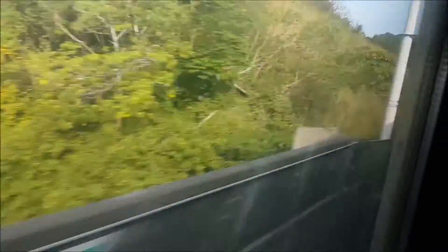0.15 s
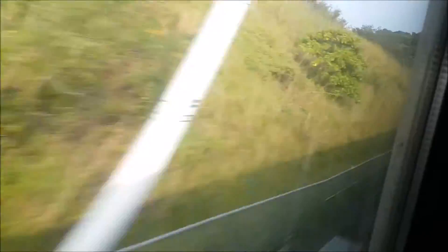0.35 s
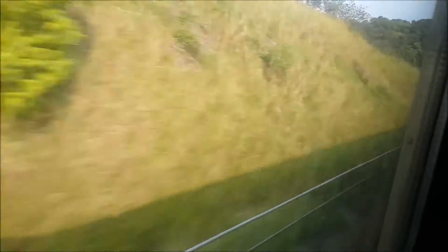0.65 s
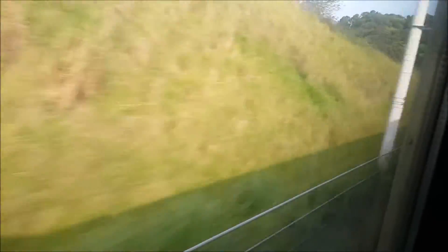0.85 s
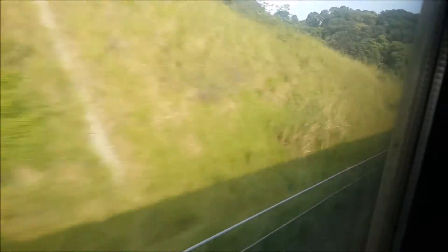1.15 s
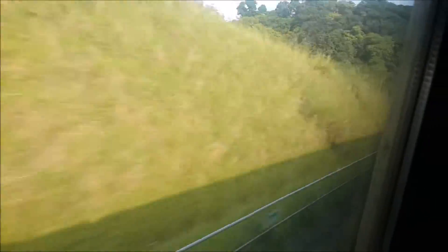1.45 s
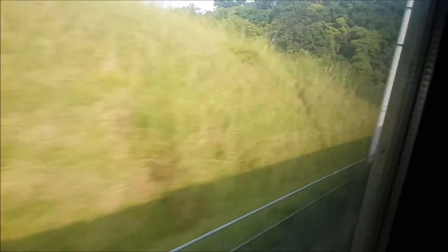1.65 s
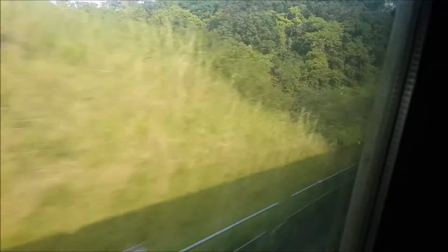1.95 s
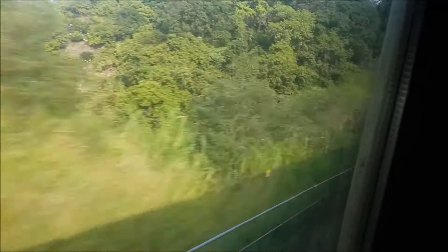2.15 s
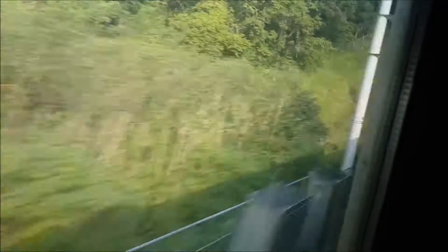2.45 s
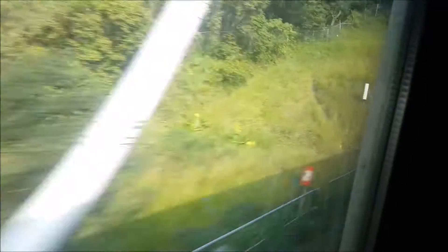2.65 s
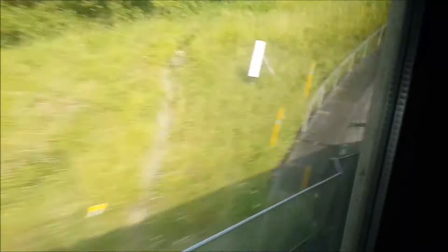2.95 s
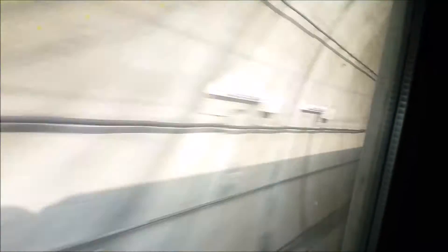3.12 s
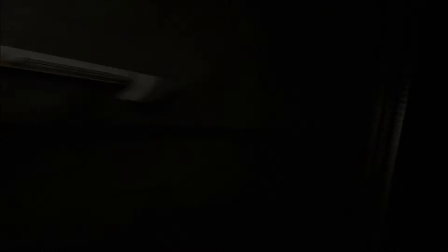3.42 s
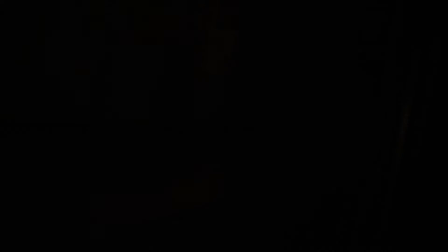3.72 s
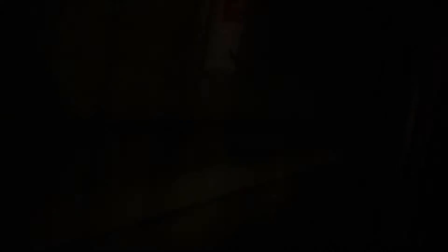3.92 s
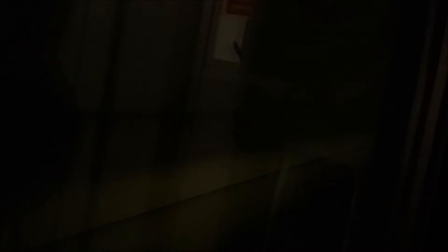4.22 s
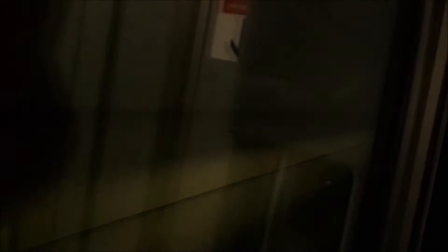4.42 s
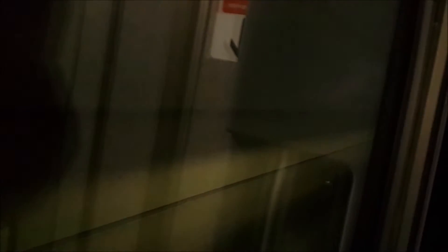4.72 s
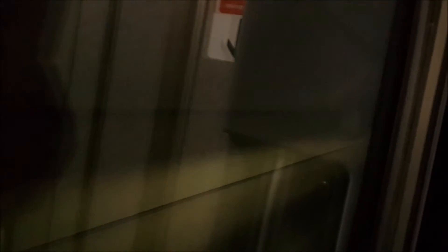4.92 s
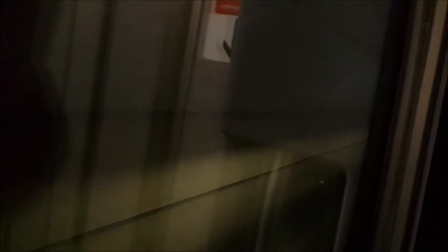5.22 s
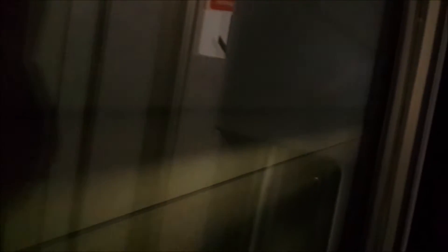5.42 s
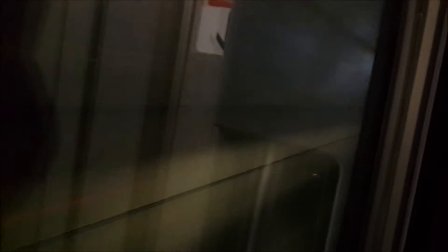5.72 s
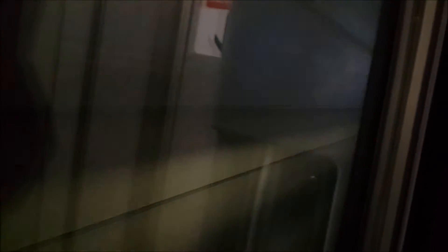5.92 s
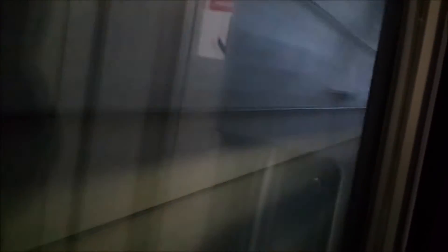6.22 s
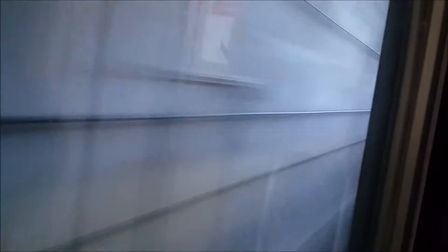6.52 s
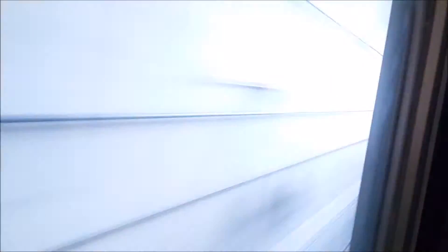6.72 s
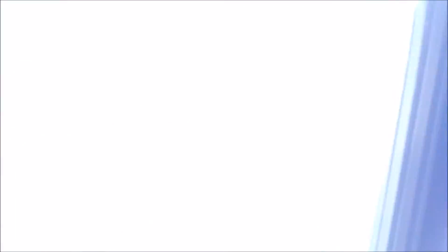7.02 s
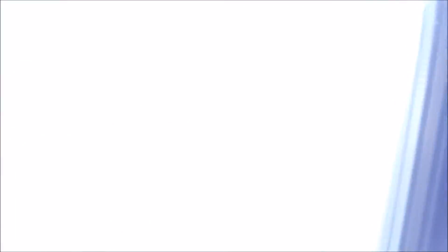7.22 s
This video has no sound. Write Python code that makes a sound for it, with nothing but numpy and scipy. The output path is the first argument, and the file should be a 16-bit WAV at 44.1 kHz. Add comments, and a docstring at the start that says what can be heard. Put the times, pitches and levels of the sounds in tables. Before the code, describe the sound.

A high-speed train runs along, heard from a window seat inside the car. A deep, gently throbbing rumble carries on throughout beneath a softer roar of wheels and air. The drive whines faintly, and the steel wheels sing in thin high swells with a few tiny squeaks. Midway a short tunnel colours the noise slightly, and plastic trim ticks twice near the end.

```python
"""Inside a high-speed train that slowly gathers speed and runs through a short tunnel.
The bogies shake the car body, which booms under the roar of wheels and air. The drive whines in
evenly spaced orders; the rubbing steel wheels sing faintly in swells and squeaks. The tunnel
walls colour the running noise, and the plastic trim slips and ticks twice."""
import sys
import numpy as np
from scipy import signal
from scipy.fft import rfft, irfft
from scipy.io import wavfile
from scipy.ndimage import uniform_filter1d, minimum_filter1d

SR = 44100
rng = np.random.default_rng(int(sys.argv[2]) if len(sys.argv) > 2 else 0)


def wav_record(signal):
    """Record a signal, one row per channel, as 16-bit PCM in the file named by sys.argv[1]."""
    frames = np.transpose(np.atleast_2d(signal))
    bounded = np.clip(frames, -1, 1)
    # unit amplitude maps onto the largest positive 16-bit level
    quanta = np.round(bounded * 32767).astype(np.int16)
    wavfile.write(sys.argv[1], SR, quanta)


N = 324576
TIME, HZ = np.arange(N) / SR, np.fft.rfftfreq(N, 1 / SR)


def amp(db):
    """Decibels to gain."""
    return 10 ** (np.asarray(db) / 20)


def unit_rms(x):
    """Scales to rms 1."""
    return x / np.sqrt(np.mean(abs(x) ** 2) + 1e-20)


def spectrum(rows):
    """A frequency table at every FFT bin, interpolated over log f."""
    hz, value = np.transpose(rows)
    return np.interp(np.log(HZ + 1), np.log(hz + 1), value)


def curve(rows, column=1):
    """One column of a time table at every sample."""
    columns = np.transpose(rows)
    return np.interp(TIME, columns[0], columns[column])


def swing_db(rows):
    """A level curve about its mean."""
    db = curve(rows)
    return db - db.mean()


def pan(side_db):
    """Stereo gains for a left-minus-right (L-R) level."""
    return amp(np.array([[.5], [-.5]]) * side_db)


def hump(peak_s, length_s):
    """Smooth rise and fall, 0 to 1 and back."""
    return np.cos(np.pi * np.clip((TIME - peak_s) / length_s, -.5, .5)) ** 2


def drift(rate_hz, channels=1):
    """Smooth random motion, rms 1."""
    white = rfft(rng.standard_normal((channels, N)))
    return unit_rms(irfft(white * np.exp(-.5 * (HZ / rate_hz) ** 2), N))


def ring(hz, width_hz, coherence=0, steadiness=0):
    """A randomly rubbed resonance; steadiness > 0 evens its flutter, < 0 breaks it into chirps."""
    detuning = np.fft.fftfreq(N, 1 / SR) / width_hz
    a, b = rng.standard_normal((2, N)) + 1j * rng.standard_normal((2, N))
    rubbing = np.array([a, coherence * a + np.sqrt(1 - coherence ** 2) * b])
    envelope = unit_rms(np.fft.ifft(rubbing / (1 + 1j * detuning) ** 2))
    envelope *= (abs(envelope) ** 2 + .1) ** (-steadiness / 2)
    carrier = np.exp(2j * np.pi * np.cumsum(hz * np.ones(N)) / SR)
    return unit_rms((envelope * carrier).real)


def in_tunnel(entry_s=3.46, exit_s=7.05, portal_s=.088):
    """0 in the open, 1 in the tunnel."""
    return np.clip(np.minimum(TIME - entry_s, exit_s - TIME) / portal_s + .5, 0, 1)


# Likeness of the two ears: f/Hz, coherence/1
CABIN_COHERENCE = [(60, .993), (180, .992), (280, .965), (450, .87), (730, .78), (1200, .25), (2000, .05),
                   (3300, .2), (6000, .03)]
# Cabin balance: f/Hz, L-R/dB
CABIN_BALANCE = [(90, -.5), (160, .5), (260, 1.2), (460, .3), (800, 4.5), (1300, 4.7), (2000, .3),
                 (3800, 2), (6200, -.3), (10000, 1.5), (14500, 4.5)]

def cabin_noise(shape_db):
    """Diffuse field, rms 1: alike at both ears in the bass, unrelated in the treble."""
    a, b = rfft(rng.standard_normal((2, N)))
    coherence = spectrum(CABIN_COHERENCE)
    mid, side = a * np.sqrt(1 + coherence), b * np.sqrt(1 - coherence)
    ears = np.array([mid + side, mid - side]) * pan(spectrum(CABIN_BALANCE))
    return unit_rms(irfft(ears * amp(shape_db), N))


# Running gear through the floor: f/Hz, relative level/dB
BOGIE_SPECTRUM = [(12, -62), (24, -54), (32, -43), (40, -35), (48, -24.5), (70, -4), (92, -14), (114, -5.5),
                  (135, -7), (190, -7), (225, -9.5), (265, -16), (350, -22), (450, -27), (700, -57),
                  (1500, -78)]
# Car body resonances: f/Hz, width/Hz, lift/dB
BODY_MODES = [(148, 17, 7.5), (171.8, 12, 8.5), (208.3, 11, 4.5), (249.5, 9.7, 3), (279, 9.1, 6.5),
              (320, 12.6, 5), (384.7, 24, 6.5)]
# Swell of the boom: t/s, relative level/dB
BOOM_SWELL = [(.04, -14), (.16, -11.5), (.5, -14), (.8, -13), (1.3, -11), (1.42, -10), (1.6, -11),
              (1.9, -12.5), (2.2, -13), (2.35, -10.5), (2.75, -13.5), (2.89, -6.5), (2.98, -16.5),
              (3.13, -11.5), (3.33, -9), (3.6, -13), (3.74, -12), (3.95, -13.5), (4.2, -14.5), (4.28, -10),
              (4.5, -14.5), (4.82, -10.5), (5.0, -11), (5.2, -12), (5.55, -15), (5.8, -11), (6.0, -12),
              (6.28, -12.5), (6.45, -14), (6.85, -12), (6.92, -12.5), (7.2, -13), (7.36, -9.5)]

def body_rumble(gain_db=-11.5, boom_hz=(110, 260), drone_hz=174, steadiness=.31):
    """The bogies shake the body: an even rumble, and a swelling boom with one near-tonal resonance."""
    lift_db = sum(db / (1 + (2 * (HZ - hz) / width_hz) ** 2) for hz, width_hz, db in BODY_MODES)
    shaking = cabin_noise(spectrum(BOGIE_SPECTRUM) + lift_db)
    band = 1 / (1 + (boom_hz[0] / (HZ + 1)) ** 8) / (1 + (HZ / boom_hz[1]) ** 8)
    boom = irfft(rfft(shaking) * band, N)
    bed = shaking - boom
    boom += amp(-8.5) * ring(drone_hz, width_hz=8, coherence=1, steadiness=.97)
    power = uniform_filter1d(uniform_filter1d((boom ** 2).mean(0), size=3200), size=1600)
    evening = (power / power.mean()) ** (-steadiness / 2)  # tames the random throb
    return amp(gain_db) * (bed + boom * evening * amp(swing_db(BOOM_SWELL)))


# Rolling noise and air along the skin: f/Hz, relative level/dB
ROAR_SPECTRUM = [(150, -5), (400, -3), (620, 0.5), (800, -5), (1000, -7), (1250, -10.5), (1650, -10.5),
                 (1950, -7), (2600, -8), (3400, -21.5), (6800, -19), (9000, -31), (12000, -40.5),
                 (15400, -46)]
# Rush of wheels and air: t/s, relative level/dB
RUSH_LEVEL = [(0, 3), (.22, -0.6), (1.0, -1), (1.5, 0), (2.2, 2.5), (2.7, -0.1), (3.05, 1.5), (4.35, -0.8),
              (4.56, 2.5), (4.95, 0.5), (5.45, -1.5), (5.77, 2.5), (6.02, -0.3), (6.2, 3), (6.5, 1),
              (6.93, 3.5), (7.15, -1), (7.36, -0.5)]

def roar(gain_db=-25, floor_below_hz=700, air_above_hz=2200, gust_rms_db=.18, flutter_rms_db=1.06):
    """Floor noise, rolling noise and rushing air each follow the rush by their own amount."""
    noise = cabin_noise(spectrum(ROAR_SPECTRUM))
    lows = irfft(rfft(noise) / (1 + (HZ / floor_below_hz) ** 4), N)
    below_air = irfft(rfft(noise) / (1 + (HZ / air_above_hz) ** 4), N)
    rush_db, gust_db = swing_db(RUSH_LEVEL), gust_rms_db * drift(3.3)
    floor = lows * amp(rush_db + gust_db)
    rolling = (below_air - lows) * amp(.5 * rush_db + gust_db)
    air = (noise - below_air) * amp(.73 * rush_db)
    return (floor + rolling + air) * amp(gain_db + flutter_rms_db * drift(17))


# Turning rate of the drive: t/s, f/Hz
DRIVE_RATE = [(0, 158.0), (1.4, 158.15), (2.4, 158.5), (4.5, 158.7), (6.5, 159.2), (7.36, 159.8)]
# Drive orders, gear mesh first: multiple/1, relative level/dB, L-R/dB, beat depth/dB
DRIVE_ORDERS = [(12, 5, 0.5, 0), (13, -2, -5.5, 0), (14, 0.5, 6, 2.5), (15, 3.3, -1.5, -0.5),
                (16, -1, -3.5, 0.5)]
# Load on the gear mesh: t/s, level/dB
MESH_LOAD = [(.14, -44), (.28, -41), (.46, -36.5), (.7, -36), (.94, -37.5), (1.2, -36), (1.45, -35.5),
             (1.63, -37), (1.8, -32.5), (2.25, -36.5), (2.47, -40), (2.66, -36), (3.02, -32.5), (3.2, -41),
             (3.55, -37.5), (3.87, -39.5), (3.99, -49), (4.1, -36), (4.45, -40), (4.65, -34.5), (4.85, -42),
             (5.0, -35.5), (5.2, -46), (5.35, -40.5), (5.85, -43), (6.15, -39.5), (6.32, -45), (6.5, -43),
             (6.63, -35), (6.85, -43), (7.07, -42), (7.2, -36), (7.36, -46)]

def gear_whine(beat_s=.777, beat_peak_s=2.22, jitter_hz=2, ear_lead_rad=1.62, wobble_rad=.21):
    """Drive orders waver, more so in the tunnel; uneven load gives each a narrow noise skirt."""
    rate_hz, tunnel = curve(DRIVE_RATE), in_tunnel()
    beat = np.cos(2 * np.pi * (TIME - beat_peak_s) / beat_s)
    upper_db = -44 - 2 * (tunnel - .5) + 1.5 * swing_db(RUSH_LEVEL)
    whine = np.zeros((2, N))
    for k, (multiple, db, side_db, beat_db) in enumerate(DRIVE_ORDERS):
        load_db, waver_db, skirt_db = (curve(MESH_LOAD), 1.5, -8) if k == 0 else (upper_db, 2.5, -.5)
        hz = multiple * rate_hz
        cycles = np.cumsum(hz + jitter_hz * drift(13.6)[0]) / SR + rng.random()
        ears_rad = np.array([[0], [ear_lead_rad]]) + wobble_rad * drift(3.7, channels=2)
        waver = amp((waver_db + 1.9 * tunnel) * drift(15, channels=2))
        tone = unit_rms(np.sin(2 * np.pi * cycles + ears_rad) * waver)
        skirt = amp(skirt_db) * ring(hz, width_hz=34)
        whine += amp(db + load_db + beat_db * beat) * pan(side_db) * (tone + skirt)
    return whine


# High orders of the drive: f/Hz, relative level/dB
BUZZ_SPECTRUM = [(1500, -38.5), (2300, -5), (2700, -2.5), (3200, 0), (4300, 0.5), (5400, -3), (6000, -1),
                 (6600, -0.5), (7500, -18), (10000, -41)]

def drive_buzz(level_db=-42, valley_db=-11):
    """The high orders blur into a faint, airy buzz that follows the rush."""
    between_orders = abs(np.sin(np.pi * HZ / curve(DRIVE_RATE).mean()))
    comb = cabin_noise(spectrum(BUZZ_SPECTRUM) + valley_db * between_orders)
    return comb * amp(level_db + swing_db(RUSH_LEVEL))


# Surges in the roar: peak t/s, length/s, level/dB, f/Hz
ROAR_SURGES = [(.03, .25, -27.5, 900), (0.536, 0.19, -30.5, 902), (1.658, 0.28, -30, 900),
               (3.66, 0.22, -25, 334), (5.802, 0.32, -30.5, 843), (6.16, 0.15, -27, 369.5),
               (6.243, 0.27, -27.5, 863), (6.4, .07, -24, 344)]

def roar_surges(relative_width=.24, side_db=3):
    """The roar briefly swells in a hollow band."""
    return pan(side_db) * sum(amp(db) * hump(peak_s, length_s) * ring(hz, relative_width * hz)
                              for peak_s, length_s, db, hz in ROAR_SURGES)


# Low, middle and high wheel modes: width/Hz, gain/dB
WHEEL_MODES = [(14.1, -2.6), (60, -1.5), (26, -2)]
# Modes sag as the contact point shifts: t/s, low f/Hz, middle f/Hz
WHEEL_PITCH = [(0, 2566, 5070), (1.1, 2565, 5065), (1.7, 2555, 5060), (2.1, 2560, 5030), (2.33, 2544, 4980),
               (2.5, 2563, 5030), (2.8, 2560, 5070), (3.8, 2562, 5070), (4.6, 2569, 5075),
               (5.8, 2568, 5075), (6.35, 2558, 5035), (6.75, 2572, 5065), (7.36, 2573, 5080)]
# Song between swells: mode, level/dB
WHEEL_MURMUR = [("low", -34.5), ("middle", -47), ("high", -59)]
# Swells of song: peak t/s, length/s, mode, level/dB
WHEEL_SWELLS = [(0.37, 0.26, "low", -27.5), (0.72, 0.25, "low", -27.5), (1.375, .18, "low", -31),
                (1.698, 0.3, "low", -29), (1.72, .6, "high", -46.5), (1.838, 0.47, "middle", -36.5),
                (2.13, 0.13, "middle", -38), (2.05, 0.94, "low", -33), (2.25, 0.63, "high", -48),
                (2.32, 0.37, "middle", -36), (2.43, 0.17, "low", -25.5), (2.83, 0.26, "high", -42),
                (2.88, 0.22, "low", -28), (2.95, .5, "middle", -44), (3.078, 0.5, "high", -45),
                (3.105, 0.13, "low", -35), (3.482, .16, "middle", -39), (4.55, 1.0, "middle", -44),
                (4.594, 0.48, "low", -25), (4.662, .35, "high", -43), (4.928, 0.12, "low", -31),
                (5.53, 0.32, "low", -29), (6.4, 0.45, "middle", -36.5), (6.437, 0.16, "low", -24),
                (6.6, 0.66, "high", -42.5), (6.76, 0.11, "low", -22.5), (6.918, 0.14, "low", -27)]
# Weak side modes: f/Hz, half-width/Hz, relative level/dB
WHEEL_SIDE_MODES = [(4820, 70, -1), (5310, 38, 2), (6780, 55, -7), (7660, 32, -6)]

def wheel_song(high_hz=7680, waver_hz=4.51, rasp_db=2.5):
    """Rubbed steel wheels ring in a raspy low mode, a chirping middle one and a fuzzy high one."""
    rush_db = .36 * swing_db(RUSH_LEVEL)
    envelopes = []
    for mode, rest_db in WHEEL_MURMUR:
        swell_power = sum(amp(db) ** 2 * hump(peak_s, length_s)
                          for peak_s, length_s, sung, db in WHEEL_SWELLS if sung == mode)
        envelopes.append(np.sqrt(amp(rest_db + rush_db) ** 2 + swell_power))
    low, middle, high = envelopes
    rasp = unit_rms(amp(rasp_db * drift(35, channels=2)))
    low_hz, middle_hz = curve(WHEEL_PITCH) + waver_hz * drift(4.9)[0], curve(WHEEL_PITCH, column=2)
    (low_width_hz, low_db), (middle_width_hz, middle_db), (high_width_hz, high_db) = WHEEL_MODES
    song = low * rasp * amp(low_db) * ring(low_hz, low_width_hz, coherence=.38, steadiness=.64)
    song += middle * amp(middle_db) * ring(middle_hz, middle_width_hz, steadiness=-.22)
    song += high * amp(high_db) * ring(high_hz, high_width_hz)
    peaks = sum(amp(db) / (1 + ((HZ - hz) / half_hz) ** 2) for hz, half_hz, db in WHEEL_SIDE_MODES)
    side_modes = amp(-49 + rush_db) * cabin_noise(20 * np.log10(peaks))
    sizzle = np.hypot(amp(-54), middle * amp(-10)) * ring(5150, width_hz=420)
    sizzle += high * pan(2.3) * ring(7600, width_hz=520)
    overtones = ring(10230, 380) + amp(-13) * ring(12800, 130) + amp(-6.5) * ring(11500, 1500)
    overtones *= amp(-57 - 11 * in_tunnel() + rush_db)
    return song + side_modes + sizzle + overtones


# Squeaks of the middle mode: peak t/s, length/s, level/dB
WHEEL_SQUEAKS = [(1.884, .05, -36), (2.14, .05, -38), (2.315, .08, -37), (6.203, .04, -38),
                 (6.305, 0.031, -36), (6.423, .06, -35)]

def wheel_squeaks(flutter_hz=25, side_db=.4):
    """A wheel catches for a moment and its middle mode rings clean."""
    hz = curve(WHEEL_PITCH, column=2) + flutter_hz * drift(30, channels=2)
    tone = unit_rms(np.sin(2 * np.pi * np.cumsum(hz, axis=1) / SR))
    envelope = sum(amp(db) * hump(peak_s, length_s) for peak_s, length_s, db in WHEEL_SQUEAKS)
    return envelope * pan(side_db) * tone


# Colour of the tunnel walls: f/Hz, gain/dB
WALL_RESPONSE = [(200, 0), (270, -1), (360, 1.5), (450, 1.5), (600, 0.7), (740, 1.4), (900, 1.3), (1400, 2),
                 (2000, 0.4), (2900, 3), (4000, 2), (6500, -0.5), (8000, 0), (10500, -1), (14000, -2.5)]

def tunnel_walls(running):
    """The walls throw the running noise back and change its colour."""
    reflected = irfft(rfft(running) * (amp(spectrum(WALL_RESPONSE)) - 1), N)
    return running + in_tunnel() * reflected


# Slips of the trim: t/s, level/dB, ring t60/s, L-R/dB
TRIM_SLIPS = [(5.437, -30, .008, 7), (6.474, -20.5, 0.12, 5)]
# Colour of the snap: f/Hz, relative level/dB
SNAP_SPECTRUM = [(1200, -8), (2600, 8), (4000, -2), (5400, 12), (6800, 7.5), (8000, 4), (10000, -7),
                 (12500, -14), (14200, -9), (15400, -13)]

def trim_ticks(rise_s=.0024, snap_s=.0028, tail_db=-9, rattle_db=-29, rattle_t60_s=.17):
    """A plastic panel slips: a quick build-up, a snap, a short ring and a thin bright rattle."""
    snap_envelope, rattle_envelope = np.zeros((2, 2, N))
    for start_s, db, t60_s, side_db in TRIM_SLIPS:
        age_s = np.maximum(TIME - start_s - rise_s, 0)
        slip = amp(db) * pan(side_db) * np.clip((TIME - start_s) / rise_s, 0, 1) ** 2
        tail = amp(tail_db - 60 * np.minimum(age_s / t60_s, 10))
        snap_envelope += slip * (np.exp(-age_s / snap_s) + tail)
        rattle_envelope += slip * amp(rattle_db - 60 * np.minimum(age_s / rattle_t60_s, 10))
    snaps = snap_envelope * cabin_noise(spectrum(SNAP_SPECTRUM))
    chatter = amp(3 * drift(150))
    return snaps + rattle_envelope * chatter * ring(14200, width_hz=1500)


def scene():
    """Everything that reaches the window seat."""
    running = tunnel_walls(body_rumble() + roar())
    return (running + gear_whine() + drive_buzz() + wheel_song() + wheel_squeaks()
            + trim_ticks() + roar_surges())


def record(dry, ceiling=.95, cutoff_hz=15480):
    """Peak limiter, then low-pass."""
    needed = np.minimum(ceiling / (abs(dry).max(0) + 1e-9), 1)
    held = minimum_filter1d(needed, size=801)
    gain = uniform_filter1d(uniform_filter1d(held, size=400), size=400)
    lowpass = signal.firwin(1023, cutoff_hz, window=("kaiser", 9), fs=SR)
    return signal.oaconvolve(dry * gain, lowpass[None], "same")


dry = scene()
out = record(dry)
wav_record(out)
```